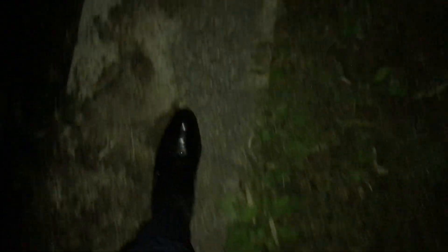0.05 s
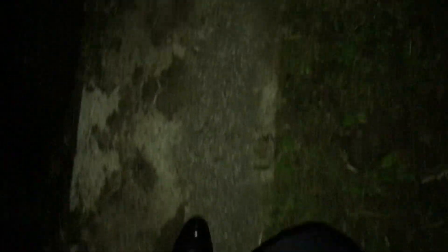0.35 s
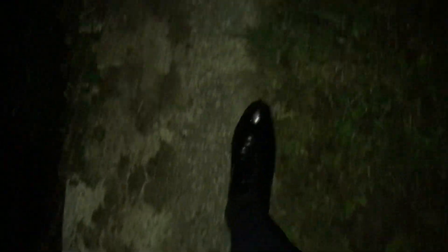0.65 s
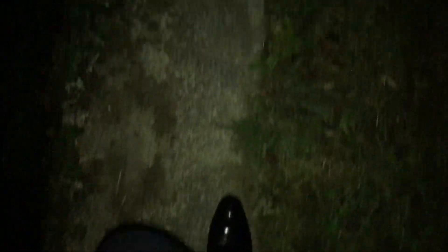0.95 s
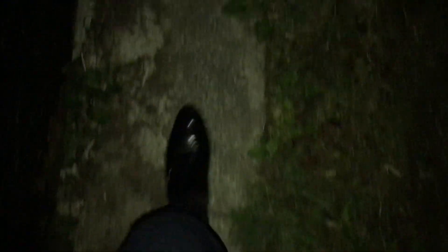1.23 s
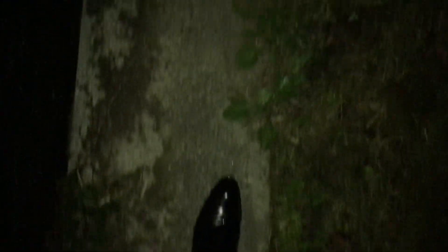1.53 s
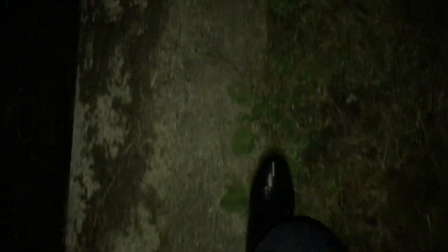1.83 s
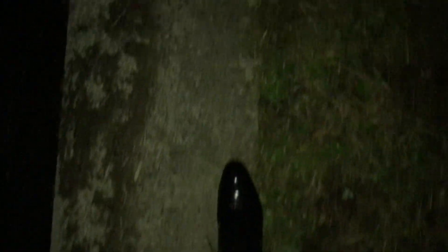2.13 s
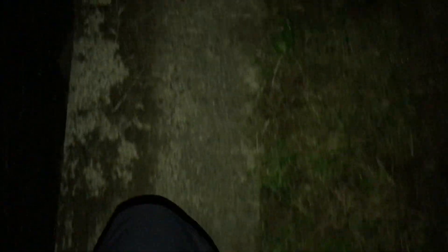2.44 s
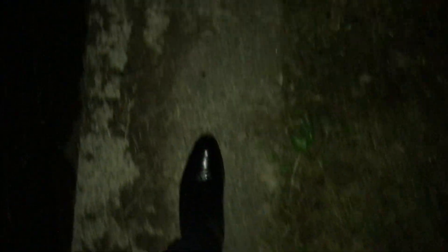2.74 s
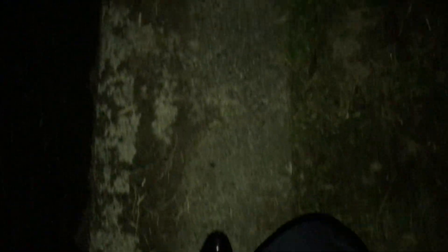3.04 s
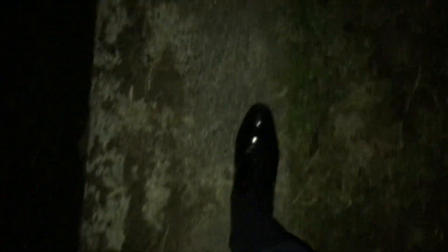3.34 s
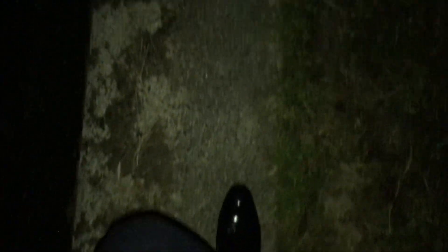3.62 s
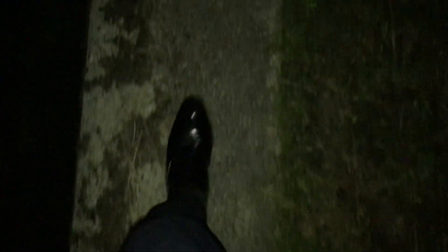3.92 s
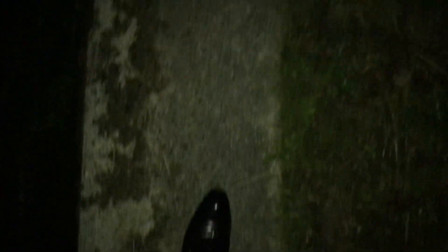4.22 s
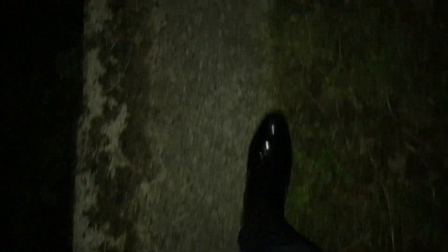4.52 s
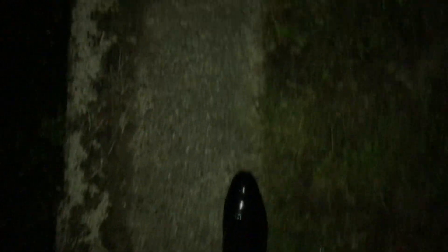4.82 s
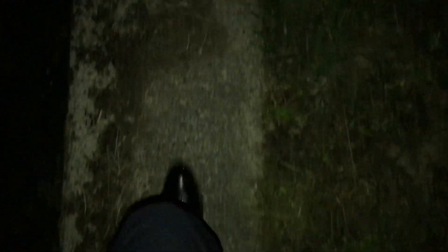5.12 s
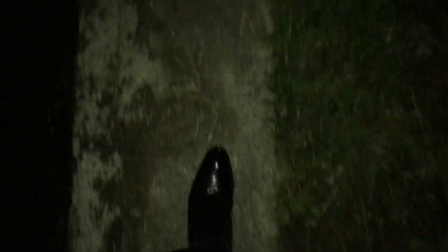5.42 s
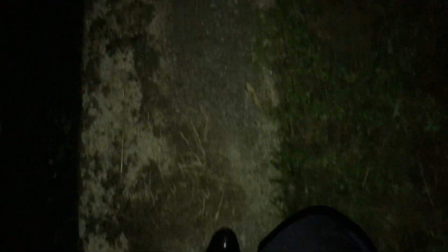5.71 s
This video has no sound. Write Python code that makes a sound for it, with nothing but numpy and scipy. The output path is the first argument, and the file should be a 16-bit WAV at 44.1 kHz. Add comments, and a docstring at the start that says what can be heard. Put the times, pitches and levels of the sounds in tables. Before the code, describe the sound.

Frogs call in high, rising rattles over a farther chorus on a quiet night outdoors. Close to the microphone and much louder, hard shoes take about nine steady steps on gritty concrete, thudding, clacking and crackling as small grains break underfoot. Two soft plops sound in the distance, and a faint, low engine hum picks up a little speed late on, then fades.

```python
"""A damp, gritty concrete path at night, microphone at chest height, close to a walker in hard shoes.
Each step is a heel thud, then the sole slapping down, crushing grit and rolling off to the toe;
the breaking grains tick and ring the sole. Some way off, frogs call in rising rattles, pulses
ringing their throats, with two faint plops and a farther chorus behind. In the distance an engine
hums under the night air and picks up speed near the end."""
import sys
import numpy as np
from scipy import signal
from scipy.fft import rfft, irfft
from scipy.io import wavfile
from scipy.ndimage import uniform_filter1d

SR = 44100
rng = np.random.default_rng(int(sys.argv[2]) if len(sys.argv) > 2 else 0)


def unload_audio(sound):
    """Save the sound as a 16-bit wav file, at the path given as the first command line argument."""
    columns = np.transpose(np.atleast_2d(sound))
    # keep every value between -1 and 1, then stretch to whole-number steps
    steps = np.round(np.clip(columns, -1, 1) * 32767)
    wavfile.write(sys.argv[1], SR, steps.astype(np.int16))


N = 262836
STEP_S = .658  # from one step to the next
SOLE_HZ = 1661  # main resonance of the unshifted sole spectrum

# Levels in the tables are relative: each source and the mix apply their own gains.
# heel landings: start_s, thud_db, thud_hz, click_db, sole_db, grit_db
HEEL_STRIKES = [(0.066, -47, 200, -55, -41, -43.5), (.697, -39, 221, -48, -51, -50.5),
                (1.372, -34.5, 234, -48, -43, -45), (2.051, -45.5, 850, -57, -75, -77),
                (2.692, -33.5, 339, -46, -40.5, -44.5), (3.345, -40.5, 300, -51, -48, -47),
                (4.031, -32, 193.3, -27, -39.5, -41), (4.689, -39.5, 226, -48, -49, -49.5),
                (5.332, -41, 317, -46, -43.5, -45)]
# sole slaps: start_s, thud_db, thud_hz, clack_db, clack_hz, crunch_rise_s, crunch_s, sole_db, grit_db
SOLE_SLAPS = [(0.137, -42.5, 183, -51, 1650, 0.011, 0.043, -40, -46),
              (0.7982, -46, 560, -24.5, 1460, 0.0066, 0.041, -44.5, -47.5),
              (1.4614, -36.5, 193, -22.5, 1460, 0.0057, 0.028, -36.5, -42.5),
              (2.112, -49, 250, -38, 1500, .02, 0.056, -42, -45.5),
              (2.765, -33.5, 195, -33, 1256, 0.014, 0.033, -36, -42),
              (3.465, -50, 394, -34, 1800, 0.016, 0.037, -39.5, -47),
              (4.102, -41, 170.4, -24.5, 1758, .006, 0.034, -35.5, -40),
              (4.764, -46.5, 235, -26, 1950, 0.0046, .034, -37.5, -43),
              (5.418, -32, 193, -24.5, 1340, 0.0062, 0.022, -42, -41.5)]
# the foot rolling forward: start_s, length_s, sole_db, grit_db
FOOT_ROLLS = [(0.205, 0.19, -58, -70), (0.861, 0.15, -54.5, -54), (1.5, 0.16, -50, -54.5),
              (2.193, .14, -53.5, -53), (2.821, 0.14, -46, -63), (3.515, 0.083, -52.5, -55),
              (4.148, 0.15, -50, -64), (4.809, 0.11, -59.5, -51), (5.446, 0.17, -46.5, -56.5)]
# toes pressing off: start_s, thud_db, sole_db
TOE_PUSHES = [(0.274, -40, -50), (1.578, -65, -48.5), (2.267, -36, -63), (4.889, -44, -68)]
# a shoe brushing the path: start_s, length_s, sole_db, grit_db
SHOE_SKIMS = [(1.956, 0.019, -52, -51.5), (1.97, 0.21, -59, -57), (5.794, 0.113, -69.5, -60)]
# larger grains cracking underfoot: start_s, sole_db, sole_hz, tick_db
GRAIN_CRACKS = [(0.0826, -18.5, 2060, -48), (0.286, -29, 1400, -57), (.831, -35, 1710, -19),
                (.999, -49, 1700, -35), (1.695, -32, 1600, -53), (2.176, -33, 1743, -47),
                (2.211, -54, 1700, -21.5), (2.28, -44, 1720, -22.5), (2.7123, -24.5, 1880, -31),
                (2.79, -22.5, 1730, -19), (2.87, -39, 1700, -27.5), (2.981, -33, 1623, -60),
                (3.022, -34, 1670, -60), (3.492, -44, 1636, -24.5), (4.161, -23, 1967, -22.5),
                (4.471, -42, 1500, -37), (4.779, -31, 1310, -29), (4.888, -50, 2010, -20),
                (5.436, -22, 1800, -21.5)]
# spectrum of the ringing sole: frequency_hz, level_db
SOLE_SPECTRUM = [(100, -13.5), (220, -9), (420, -6.5), (650, -3.5), (900, -4.5), (1150, 1), (1400, 4.5),
                 (1750, 4.5), (2100, 1), (2500, -4), (3100, -26), (4500, -10), (7000, -51)]
# spectrum of breaking grit: frequency_hz, level_db
GRIT_SPECTRUM = [(1500, -11), (3000, 3), (4300, 3.5), (5000, 0), (6000, 3), (7000, -1), (8600, 2),
                 (10400, -7), (11300, -3), (13000, -7), (16000, -11)]
# frog calls some way off: start_s, voice, level_db
FROG_CALLS = [(.125, "near", -49), (.435, "near", -48.5), (.58, "middle", -56), (.735, "low", -48.5),
              (.89, "high", -51), (1.04, "low", -49.5), (1.275, "high", -58), (1.424, "low", -52.5),
              (1.62, "middle", -56), (1.775, "low", -52), (2.24, "high", -52), (2.39, "low", -48),
              (2.651, "high", -52.5), (2.78, "middle", -51.5), (3.029, "near", -51), (3.205, "middle", -55),
              (3.42, "low", -50), (3.55, "high", -52.5), (3.781, "low", -51), (3.995, "high", -52),
              (4.15, "low", -52), (4.34, "middle", -52.5), (4.495, "near", -48.5), (4.68, "middle", -51),
              (4.862, "near", -49), (5.035, "middle", -51), (5.27, "high", -54.5), (5.42, "middle", -51.5),
              (5.615, "near", -47.5), (5.79, "middle", -53.5)]
# frog voices by name, before each frog's pitch ratio: pitch_hz, rise_hz, length_s
FROG_VOICES = {"near": (3240, 560, .18), "low": (3276, 220, .18), "middle": (3380, 353, .165),
               "high": (3580, 350, .19)}
# hollow plops some way off: start_s, pitch_hz, level_db, t60_s
FAINT_PLOPS = [(1.904, 650, -47.5, 0.13), (4.534, 466, -52, .16)]
# the distant engine's fundamental: time_s, firing_hz, level_db
ENGINE_FIRING = [(0.0, 56.8, -57), (0.38, 57.3, -57.5), (0.73, 57.6, -50.5), (1.03, 56.7, -52),
                 (1.28, 57.2, -59.5), (1.56, 56.7, -50.5), (2.69, 56.54, -49.5), (2.79, 57.8, -46.5),
                 (2.87, 56.3, -47.5), (3.12, 56.44, -46.5), (4.12, 56.1, -49), (4.5, 63.3, -52),
                 (4.98, 63.8, -55.5), (5.51, 62.4, -70.5), (5.66, 64, -61), (5.96, 61.1, -65)]
# its next two harmonics: time_s, second_db, third_db
ENGINE_HARMONICS = [(0.0, -66, -69), (0.56, -68.5, -75.5), (0.94, -74, -66.5), (1.36, -81, -62.5),
                    (4.0, -68, -72), (4.28, -61, -86), (4.68, -74.5, -70), (5.96, -78, -86)]
# spectrum of the night air: frequency_hz, level_db
AIR_SPECTRUM = [(20, 8.5), (40, -11.5), (75, -7.5), (130, -5), (240, -4.5), (430, -14), (1000, -12.5),
                (2300, -14), (2900, -14), (4300, -17), (5200, -23), (8500, -25.5), (10500, -28),
                (16000, -28.5)]


def footsteps():
    """Hard shoes close to the microphone, all working the same grit."""
    path = gravel()
    return heels(path) + slaps(path) + rolls(path) + toes(path) + skims(path) + cracks() + ticks()


def heels(path, bite_lag_s=.004):
    """Each heel thuds and clicks, and its edge bites into the grit with a short bright hiss."""
    out = np.zeros(N)
    for s, thud_db, thud_hz, click_db, sole_db, grit_db in HEEL_STRIKES:
        add(out, s, thud(thud_db, thud_hz, t60=.028))
        add(out, s, snap(s, click_db, sole_hz=1700, tick_db=click_db - 18))
        bite = scuff(path, s, sole_db, grit_db, length_s=.013, sole_hz=1600,
                     top_db=10, focus=.91, rise_s=.004, fall_s=.031)
        add(out, s + bite_lag_s, bite)
    return out


def slaps(path):
    """The sole comes down with a thud and a clack, then the full weight crunches the grit."""
    out = np.zeros(N)
    for s, thud_db, thud_hz, clack_db, clack_hz, rise_s, length_s, sole_db, grit_db in SOLE_SLAPS:
        add(out, s, thud(thud_db, thud_hz, t60=.067))
        add(out, s, snap(s, clack_db, clack_hz, tick_db=clack_db - 7))
        crunch = scuff(path, s, sole_db, grit_db, length_s, sole_hz=1830,
                       top_db=.5, focus=1.59, rise_s=rise_s, fall_s=.015, ease_db=3.5)
        add(out, s + rise_s / 2, crunch)
    return out


def rolls(path):
    """As the foot rolls forward the load eases and the crackle fades."""
    out = np.zeros(N)
    for s, length_s, sole_db, grit_db in FOOT_ROLLS:
        crackle = scuff(path, s, sole_db, grit_db, length_s, sole_hz=1650, top_db=-2, focus=1.12,
                        rise_s=.0066, fall_s=.037, ease_db=7, coarse_share=.22, dense_from_db=-46)
        add(out, s, crackle)
    return out


def toes(path):
    """The toe knocks lightly and gives a last dull scrape."""
    out = np.zeros(N)
    for s, thud_db, sole_db in TOE_PUSHES:
        add(out, s, thud(thud_db, hz=330, t60=.015))
        scrape = scuff(path, s, sole_db, grit_db=sole_db - 17, length_s=.024, sole_hz=1500,
                       top_db=-13, focus=.85, rise_s=.0085, fall_s=.022)
        add(out, s, scrape)
    return out


def skims(path):
    """With little weight on it, the shoe only brushes the sand."""
    out = np.zeros(N)
    for s, length_s, sole_db, grit_db in SHOE_SKIMS:
        brush = scuff(path, s, sole_db, grit_db, length_s, sole_hz=1700,
                      top_db=6, focus=1.3, rise_s=.098 * length_s, fall_s=.46 * length_s)
        add(out, s, brush)
    return out


def cracks():
    """Larger grains give way one at a time."""
    out = np.zeros(N)
    for s, sole_db, sole_hz, tick_db in GRAIN_CRACKS:
        add(out, s, snap(s, sole_db, sole_hz, tick_db))
    return out


def ticks(count=90, decay_s=.0032):
    """Loose wet grains flick off the shoes at random, each with a pitch of its own."""
    out, t = np.zeros(N), np.arange(SR // 60) / SR
    for when, pitch, smallness in rng.random((count, 3)):
        burst = rng.standard_normal(len(t)) * np.exp(-t / decay_s)
        tick = band(burst, hz=5000 + 7000 * pitch, width_hz=6100, order=1)
        peak_db = -57 - 3 * np.log(smallness + .0058)  # mostly faint, a few louder
        add(out, when * N / SR, undb(peak_db) * tick / np.abs(tick).max())
    return out


def thud(db, hz, t60, knock_ratio=1.87, knock_t60=.021):
    """The weight lands: a damped low swing of the shoe, a knock above it and a dull crush of dirt."""
    t = np.arange(SR // 8) / SR
    swing = np.sin(2 * np.pi * hz * t) * 1000 ** (-t / t60)
    knock = np.sin(2 * np.pi * knock_ratio * hz * t) * 1000 ** (-t / knock_t60)
    dirt = unit(band(rng.standard_normal(len(t)), hz=507, width_hz=510))
    crush = dirt * 1000 ** (-t / (2 * t60))
    return undb(db) * (swing + undb(-5) * knock + undb(-12) * crush)


def snap(s, sole_db, sole_hz, tick_db, crumble_s=.0023):
    """One sharp contact rings sole and grit, with a brief crumbling behind it."""
    t = np.arange(SR // 80) / SR
    push = .076 * rng.standard_normal(len(t)) * np.exp(-t / crumble_s)
    push[0] = 1  # the contact itself
    ring = signal.fftconvolve(push, sole_response(s, sole_hz, focus=1))
    tick = signal.fftconvolve(push, response(GRIT_SPECTRUM))
    return undb(sole_db - 1) * ring / np.abs(ring).max() + undb(tick_db - 1) * tick / np.abs(tick).max()


def scuff(path, s, sole_db, grit_db, length_s, sole_hz, top_db, focus, rise_s, fall_s,
          ease_db=0, coarse_share=.57, dense_from_db=-44):
    """Grit breaks under the shoe; each grain ticks and rings the sole. top_db tilts the highest hiss."""
    t = np.arange(int((length_s + 5 * fall_s) * SR)) / SR
    # the pressure rises, eases while it holds, and lets go
    pressure = np.minimum(t / rise_s, 1) * undb(-ease_db * t / length_s)
    pressure *= np.exp(-np.maximum(t - length_s, 0) / fall_s)
    at = np.minimum(int(s * SR) + np.arange(len(t)), N - 1)
    sparse, dense, fine, slipping = (layer[at] for layer in path)
    # the harder the push, the more grains break at once
    coarse = unit(sparse + undb(sole_db - dense_from_db) * dense) * slipping
    crackle = np.sqrt(coarse_share) * coarse + np.sqrt(1 - coarse_share) * fine
    sand_spectrum = [(f, db + top_db * np.clip(np.log2(f / 7000), 0, 1)) for f, db in GRIT_SPECTRUM]
    ring = signal.fftconvolve(pressure * coarse, sole_response(s, sole_hz, focus))
    hiss = signal.fftconvolve(pressure ** 1.23 * crackle, response(sand_spectrum))
    crunch = undb(sole_db) * ring / np.linalg.norm(ring) + undb(grit_db) * hiss / np.linalg.norm(hiss)
    return np.sqrt(length_s * SR) * crunch


def sole_response(s, hz, focus, hollow_db=4.5, hollow_hz=800):
    """The ring of a bending sole; focus is how strongly it favours its main resonance."""
    foot = 1 if int(s / STEP_S) % 2 else -1  # the feet take turns, and one shoe sounds hollower
    spectrum = [(f, db * focus + foot * hollow_db * np.exp(-2 * np.log2(f / hollow_hz) ** 2))
                for f, db in SOLE_SPECTRUM]
    return response(spectrum, shift=hz / SOLE_HZ)


def gravel(stutter_db=1.5, patchy_db=3):
    """The grit on the path: lone coarse grains, a dense crush, fine sand, and slipping in fits."""
    slipping = undb(stutter_db * walk(260) + patchy_db * walk(70))
    sparse = grains(rate=380, spread_db=3.5)
    dense = rng.standard_normal(N)
    fine = grains(rate=3500, spread_db=7.5)
    return sparse, dense, fine, slipping


def frogs(pitch_ratio, pulse_hz=160, throat_width_hz=260, strain=.36, jitter=.03, low_hz=1630):
    """Some way off, each call's fast pulses ring a rising throat resonance and a weaker low one."""
    out, ring_t = np.zeros(N), np.arange(SR // 100) / SR
    low_tone = undb(-7) * np.sin(2 * np.pi * low_hz * ring_t)
    for s, voice, db in FROG_CALLS:
        from_hz, rise_hz, length_s = FROG_VOICES[voice]
        timing, sizes, detunes = rng.standard_normal((80, 3)).T
        # a call that climbs further is more strained: its resonance is broader
        ring = ring_t * np.exp(-np.pi * (throat_width_hz + strain * abs(rise_hz)) * ring_t)
        # the rattle speeds up a little as the pitch rises
        hurry = (1 + rise_hz / from_hz) ** (np.arange(len(timing)) / (pulse_hz * length_s) - .5)
        rattle_hz = pulse_hz * (1 + .04 * timing[0])
        times = np.cumsum((1 + jitter * timing) / hurry) / rattle_hz
        call = np.zeros(int(length_s * SR) + len(ring))
        for t, size, detune in zip(times[times < length_s], sizes, detunes):
            progress = t / length_s
            hz = pitch_ratio * (from_hz + rise_hz * progress ** .88) * (1 + .007 * detune)
            throat = np.sin(2 * np.pi * hz * ring_t) + low_tone
            swell = np.sin(np.pi * progress ** .72) ** .73  # peaks early and lingers
            add(call, t, swell * undb(2 * size) * throat * ring)
        add(out, s, undb(db) * unit(call))
    # the vocal sac radiates in two bands only
    return band(out, hz=3714, width_hz=827, order=5) + band(out, low_hz, width_hz=250, order=1)


def plops(rise_s=.001):
    """Soft, round, quickly fading notes some way off."""
    out, t = np.zeros(N), np.arange(SR // 5) / SR
    for s, hz, db, t60 in FAINT_PLOPS:
        envelope = (1 - np.exp(-t / rise_s)) * 1000 ** (-t / t60)
        add(out, s, undb(db) * np.sin(2 * np.pi * hz * t) * envelope)
    return out


def chorus():
    """Farther out, many frogs merge into one rattle in two throat resonances."""
    pulses = grains(rate=2500, spread_db=2) * undb(2 * walk(9))
    high = undb(-64) * unit(band(pulses, hz=3500, width_hz=420))
    low = undb(-63) * unit(band(pulses, hz=1630, width_hz=480))
    return high + low


def engine(waver_db=1.03):
    """Only the lowest exhaust tones carry to the microphone; they waver a little on the way."""
    firing_hz, first_db = curves(ENGINE_FIRING)
    second_db, third_db = curves(ENGINE_HARMONICS)
    phase = 2 * np.pi * np.cumsum(firing_hz * (1 + .001 * walk(4.8))) / SR
    return sum(np.sqrt(2) * undb(db + waver_db * k * walk(4.6)) * np.sin(k * phase)
               for k, db in enumerate((first_db, second_db, third_db), 1))


def night_air(level_db=-59.5, wander_db=.7):
    """Soft, nearly steady open air all around the microphone."""
    noise = rng.standard_normal(N + 4095)
    air = signal.fftconvolve(noise, response(AIR_SPECTRUM, size=4096), "valid")[:N]
    return undb(level_db + wander_db * walk(5.5)) * unit(air)


def outdoors(direct, wet_db, t60, dull_hz, build_s=.0017):
    """The direct sound plus a duller, diffuse echo from ground and plants."""
    t = np.arange(SR // 2) / SR
    tail = rng.standard_normal(len(t)) * 1000 ** (-t / t60) * (1 - np.exp(-t / build_s))
    lowpass = signal.butter(1, dull_hz, fs=SR, output="sos")
    tail = signal.sosfilt(lowpass, tail / np.linalg.norm(tail))
    return direct + undb(wet_db) * signal.fftconvolve(direct, tail)[:N]


def undb(db):
    """Decibels to gain."""
    return 10 ** (np.asarray(db) / 20)


def unit(x):
    """Scale to rms 1."""
    return x / np.sqrt(np.mean(x ** 2) + 1e-18)


def add(out, s, x):
    """Mix x into out from time s on."""
    i = max(int(s * SR), 0)
    out[i:i + len(x)] += x[:max(len(out) - i, 0)]


def curves(rows):
    """Each column of a table, joined by straight lines in time."""
    s, *columns = np.transpose(rows)
    return [np.interp(np.arange(N) / SR, s, c) for c in columns]


def walk(rate):
    """Slow random wander with a spread near 1."""
    k = int(SR / rate)
    return unit(uniform_filter1d(uniform_filter1d(np.repeat(rng.standard_normal(N // k + 1), k), k), k)[:N])


def response(points, shift=1, size=1024):
    """Causal unit-energy impulse response of a colour, its frequencies scaled by shift."""
    hz, db = np.transpose(points)
    f = np.maximum(np.fft.rfftfreq(size, 1 / SR), 1)
    cepstrum = irfft(np.log(undb(np.interp(np.log(f), np.log(hz * shift), db))))
    cepstrum[1:size // 2] *= 2
    cepstrum[size // 2 + 1:] = 0
    h = irfft(np.exp(rfft(cepstrum)))
    return h / np.linalg.norm(h)


def band(x, hz, width_hz, order=2):
    """Band-pass around a centre."""
    edges = np.clip([hz - width_hz / 2, hz + width_hz / 2], 10, SR / 2 - 100)
    return signal.sosfilt(signal.butter(order, edges, "band", fs=SR, output="sos"), x)


def grains(rate, spread_db):
    """Random clicks, most of them small and a few large."""
    size = undb(spread_db * np.minimum(rng.exponential(size=N), 3.5))
    return unit((rng.random(N) < rate / SR) * rng.choice([-1, 1], N) * size)


def scene():
    """Close steps over far frogs, plops, engine and night air, in mono."""
    steps = outdoors(footsteps(), wet_db=-11, t60=.33, dull_hz=2200)
    # a smaller, higher frog joins in with each call
    calls = frogs(pitch_ratio=.985) + undb(-7) * frogs(pitch_ratio=1.07)
    far_calls = undb(-4) * outdoors(calls, wet_db=-3, t60=.14, dull_hz=7000)
    return (steps + far_calls + plops() + chorus() + engine() + night_air())[None]


def record(dry, bass_hz=33, top_hz=15900):
    """The microphone drops the deepest bass and the very top."""
    bass_cut = signal.butter(3, bass_hz, "high", fs=SR, output="sos")
    top_cut = signal.ellip(10, .2, 70, top_hz, fs=SR, output="sos")
    return signal.sosfilt(top_cut, signal.sosfilt(bass_cut, dry))


dry = scene()
out = record(dry)
unload_audio(out)
```